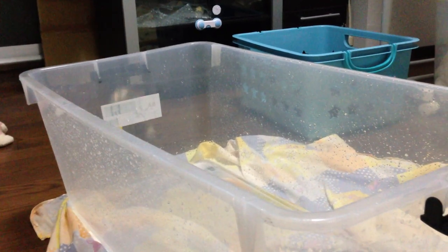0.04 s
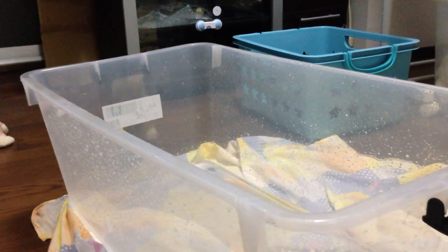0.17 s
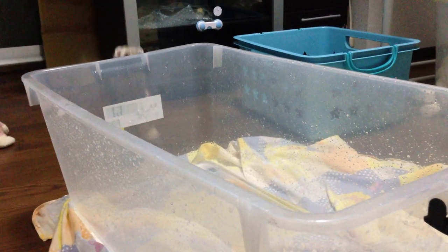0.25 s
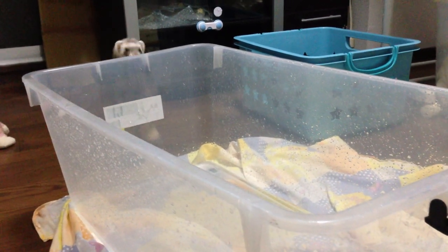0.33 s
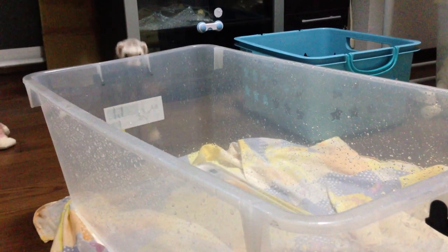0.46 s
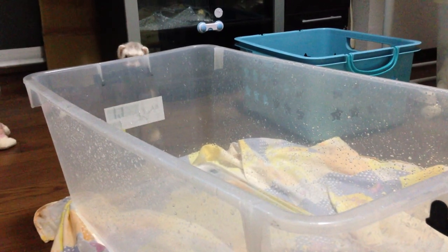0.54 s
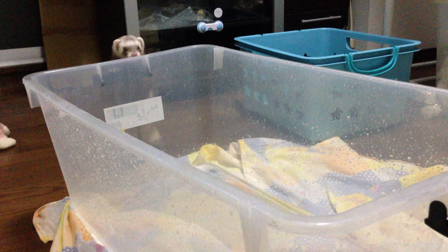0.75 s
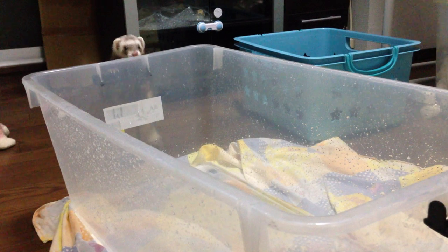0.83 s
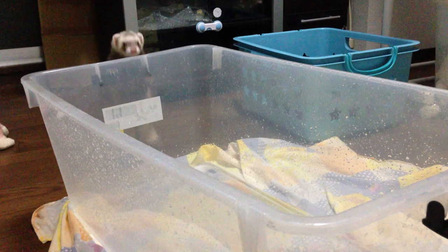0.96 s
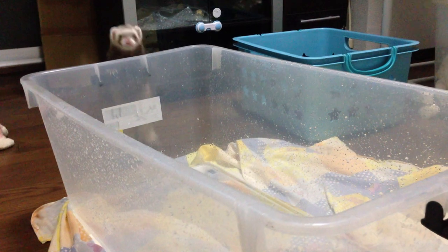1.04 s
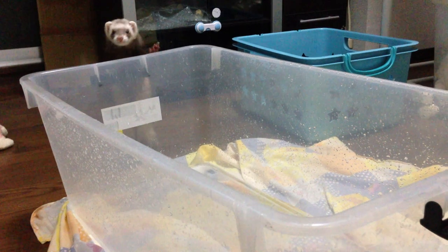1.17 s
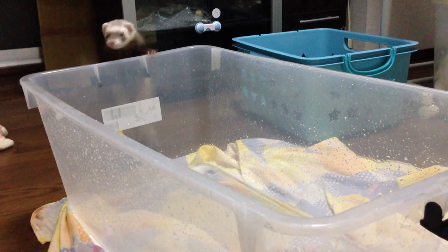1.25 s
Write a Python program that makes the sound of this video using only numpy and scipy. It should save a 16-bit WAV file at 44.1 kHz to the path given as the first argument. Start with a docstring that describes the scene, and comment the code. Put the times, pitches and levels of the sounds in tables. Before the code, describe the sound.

A ferret's paws bump a plastic bin twice, the second knock louder, each followed by lighter claw taps. A paw slides briefly, then faint touches and fur rustling fade into the hiss of a quiet room.

```python
"""Ferret climbing in a plastic bin.

Its paws bump the far wall twice, with lighter claw taps after each bump; the thin wall booms and
clacks in its modes and the quiet room answers. Soft feet thud on the floor, a paw slides briefly
over the plastic, and a few faint touches follow over rustling fur and the room's hiss."""
import sys
import numpy as np
from scipy import signal
from scipy.fft import rfft, irfft
from scipy.io import wavfile
from scipy.ndimage import uniform_filter1d

SR = 44100
rng = np.random.default_rng(int(sys.argv[2]) if len(sys.argv) > 2 else 0)


def file_out(sig):
    """Save sig as 16-bit WAV at sys.argv[1]."""
    # one column per channel
    cols = np.atleast_2d(sig).T
    # limit, then scale
    lim = np.clip(cols, -1, 1)
    pcm = np.round(lim * 32767).astype(np.int16)
    wavfile.write(sys.argv[1], SR, pcm)


N = 57330


def amp(db):
    """Decibels to gain."""
    return 10 ** (np.asarray(db) / 20)


def unit_rms(x):
    """Scales to rms 1."""
    return x / np.sqrt(np.mean(x ** 2) + 1e-20)


def at_hz(points, hz):
    """Interpolates a table on a log-frequency axis."""
    points_hz, values = np.transpose(points)
    return np.interp(np.log(hz + 1), np.log(points_hz + 1), values)


def add(mix, start_s, sound):
    """Mixes a sound in at start_s."""
    part = mix[round(start_s * SR):][:len(sound)]
    part += sound[:len(part)]


def coloured(x, colour):
    """Filters by a table of dB over Hz."""
    hz = np.fft.rfftfreq(len(x), 1 / SR)
    return irfft(rfft(x) * amp(at_hz(colour, hz)), len(x))


def noise(colour, size):
    """Coloured noise of rms 1."""
    return unit_rms(coloured(rng.standard_normal(size), colour))


def grain(samples):
    """Random flicker of rms 1, smoothed over the given length."""
    return unit_rms(uniform_filter1d(rng.standard_normal(N), size=samples))


def room_hiss(level_db=-65.5):
    """Steady background air, strongest in the bass."""
    # Each row: frequency in Hz, relative density in dB.
    colour = [(20, -14), (40, 14.5), (70, 3), (110, 5), (160, 10), (260, 7.5), (500, 2.5), (1050, -9.5),
              (2000, -7), (4000, -7.5), (9000, -10), (15000, -10.5)]
    return amp(level_db) * noise(colour, N)


def fur_rustle(grain_db=1.5):
    """Fur brushes faintly along the bin."""
    # Each row: time in seconds, level in dB.
    levels = [(0, -72.5), (.17, -70), (.65, -72.5), (.9, -71.5), (1.02, -69), (1.13, -69), (1.22, -70.5),
              (1.29, -67.5)]
    # Each row: frequency in Hz, relative density in dB.
    colour = [(80, -28), (200, -8.5), (450, -2.5), (1050, 1), (1800, -6), (4000, -34), (12000, -31)]
    level_db = np.interp(np.arange(N) / SR, *np.transpose(levels))
    return amp(level_db + grain_db * grain(300)) * noise(colour, N)


def contact_click(size, level_db=-3.5, delay_s=.0003):
    """A sharp click just after first touch, echoed by the bin's other walls."""
    # Each row: frequency in Hz, relative gain in dB.
    colour = [(200, 0.5), (1300, -19), (2000, 3), (2300, -7), (2800, -15), (3300, -12), (5000, -3),
              (7000, -3.5), (10500, -10), (13000, -31), (15000, -38)]
    # Each row: delay in seconds, gain in dB.
    echoes = [(.0018, -6.5), (.0053, -23)]
    log_gain = np.log(amp(at_hz(colour, abs(np.fft.fftfreq(size, 1 / SR)))))
    pulse = np.fft.ifft(np.exp(np.conj(signal.hilbert(log_gain)))).real  # minimum phase
    pulse *= amp(level_db) / abs(pulse).max()
    out = np.zeros(size)
    add(out, delay_s, pulse)
    for echo_s, db in echoes:
        add(out, delay_s + echo_s, amp(db) * pulse)
    return out


def wall_ring(t, force, place, spread_s=.0014, swell_cycles=.6):
    """The wall's main modes swell and decay; the place struck sets their balance."""
    # Mode frequencies in Hz.
    modes_hz = [129, 180, 235, 285, 340, 402, 490, 700, 835, 1023, 1539, 1700, 1893, 2137, 2680, 2900]
    # Each row: gain in dB struck at the edge, gain in dB struck mid-wall, T60 in seconds.
    modes = [(-10.5, -9.5, .15), (0.5, -17, 0.13), (-15, 0.5, 0.17), (-11, -8, 0.076), (-8.5, -6.5, 0.051),
             (0, -14, 0.12), (-31, -16, 0.035), (-4.5, -3, 0.061), (-12.5, -16, 0.057), (-35, -0.5, 0.06),
             (-3.5, -2.5, 0.054), (-10.5, -16, 0.038), (-1.5, -3, 0.03), (-1.5, 5, 0.017),
             (-12, -3.5, 0.032), (-13, -1, 0.024)]
    ring = 0
    for k, (hz, (edge_db, centre_db, t60_s)) in enumerate(zip(modes_hz, modes)):
        strength = amp(edge_db + place * (centre_db - edge_db) + at_hz(force, hz))
        swell = 1 - np.exp(-t / (spread_s + swell_cycles / hz))
        decay = amp(-60 * t / t60_s)
        ring += (-1) ** k * strength * swell * decay * np.sin(2 * np.pi * hz * t)
    return ring


def wall_crack(t, force, level_db=-5, bands=12):
    """The crowd of weaker modes: a noise burst, each band dying at its own rate."""
    # Each row: frequency in Hz, relative density in dB.
    colour = [(60, -13.5), (200, -2.5), (400, -0.5), (560, -14.5), (750, -24), (1200, -5), (1600, -4.5),
              (2200, -2), (2900, -3), (3400, -4.5), (4500, -8.5), (5500, -15), (9000, -24), (15000, -37)]
    # Each row: frequency in Hz, T60 in seconds.
    t60s = [(200, 0.12), (1500, 0.077), (3000, 0.053), (9000, 0.061)]
    spectrum = rfft(coloured(noise(colour, len(t)), force))
    log_hz = np.log(np.fft.rfftfreq(len(t), 1 / SR) + 1)
    centres_hz = np.geomspace(100, 12800, bands)
    crack = 0
    for hz, share in zip(centres_hz, np.eye(bands)):
        band = irfft(spectrum * np.interp(log_hz, np.log(centres_hz), share), len(t))
        crack += band * amp(-60 * t / at_hz(t60s, hz))
    return amp(level_db) * crack


def wall_knocks(grip_s=.0276, grip_db_per_s=705, size=16384):
    """Paws and claws strike the wall; the settling paw damps the ring and click."""
    # Each row: start in seconds, boom, hollow middle, clack and claw tick in dB,
    # rise in seconds, place from 0 (stiff edge) to 1 (mid-wall).
    contacts = [(0.010, -58.5, -74, -76, -80, .004, 1), (0.207, -55, -38.5, -40, -37.5, 0.0019, 0.3),
                (0.2097, -44.5, -49.5, -36.5, -44, 0.00067, 0.29),
                (0.2133, -37.5, -36, -49, -46, 0.00036, 0.054), (0.234, -42.5, -54, -58, -51, 0.0014, 0.14),
                (0.2680, -49, -46.5, -46.5, -46.5, 0.00071, 0.47),
                (0.3156, -46, -48.5, -51, -49.5, 0.00092, 0.63),
                (0.365, -45.5, -49, -54, -109, 0.0062, 0.85),
                (0.4326, -21.5, -30.5, -27.5, -35, 0.000072, 0.93),
                (0.4853, -56, -48, -44, -55, 0.0028, 0.91), (0.491, -34.5, -64, -61, -70, 0.0022, 0.65),
                (0.5052, -39, -52, -50.5, -72, 0.001, 0.8), (0.5628, -48.5, -50, -56.5, -74, .001, .5),
                (0.586, -49, -73, -60, -50, 0.0018, 0.77), (0.633, -62, -74, -79, -81, 0.0039, 0.95),
                (0.7789, -56.5, -59, -59.5, -43.5, 0.0022, 1), (0.790, -50.5, -49.5, -72, -49, 0.009, 0.56),
                (0.821, -62.5, -58, -62, -69, 0.0054, 0.006), (0.895, -66, -67, -56, -85, 0.0033, 0)]
    # Centres in Hz of boom, middle, clack and tick.
    bands_hz = [330, 850, 1900, 6000]
    out, t = np.zeros(N), np.arange(size) / SR
    grip = amp(-grip_db_per_s * np.maximum(t - grip_s, 0))
    click = contact_click(size)
    for start_s, *levels_db, rise_s, place in contacts:
        force = list(zip(bands_hz, levels_db))
        damped = (wall_ring(t, force, place) + coloured(click, force)) * grip
        attack = 1 - np.exp(-t / rise_s)
        add(out, start_s, (damped + wall_crack(t, force)) * attack)
    return out


def room_reverb(x, delay_s=.01, frame=256):
    """A diffuse wash: each band stores the sound's energy and lets it die away."""
    # Each row: frequency in Hz, gain in dB.
    colour = [(100, -18.5), (240, -16), (400, -14.5), (550, -5.5), (720, -6.5), (1020, -6.5), (1250, -7),
              (1550, -7), (2800, -6.5), (4500, -8), (8000, -7)]
    # Each row: frequency in Hz, T60 in seconds.
    t60s = [(130, 0.33), (500, .28), (2000, 0.2), (8000, 0.25)]
    hz, t, spectra = signal.stft(x, SR, nperseg=frame)
    decay = np.exp(-np.log(1e6) * t / at_hz(t60s, hz)[:, None])
    decay /= decay.sum(1, keepdims=True)
    energy = signal.fftconvolve(abs(spectra) ** 2, decay, axes=1)[:, :len(t)]
    scatter = signal.stft(rng.standard_normal(N), SR, nperseg=frame)[2]
    wash = signal.istft(np.sqrt(abs(energy)) * scatter / scatter.std(), SR, nperseg=frame)[1][:N]
    out = np.zeros(N)
    add(out, delay_s, coloured(wash, colour))
    return out


def footfalls(note_hz=166.5, peak_s=.012):
    """Padded feet thud on the floor, all with one dull note."""
    # Each row: start in seconds, level in dB.
    steps = [(0.267, -52), (0.29, -79), (0.506, -47.5), (1.07, -62), (1.197, -63)]
    out, t = np.zeros(N), np.arange(SR // 4) / SR
    thud = t / peak_s * np.exp(1 - t / peak_s) * np.sin(2 * np.pi * note_hz * t)
    for start_s, db in steps:
        add(out, start_s, amp(db) * thud)
    return out


def paw_slide(peak_s=.601, rise_s=.013, fall_s=.027, turn_s=.0091, level_db=-58, grain_db=1.5):
    """A paw slips over the plastic: a short grainy hiss that thins as the paw speeds up."""
    # Each row: frequency in Hz, relative density in dB.
    colour = [(100, -18), (500, -10), (2000, 6), (3900, 5.5), (5000, 1.5), (6300, 1), (9500, -3.5),
              (12000, -14), (15000, -15)]
    # Tilt faded in around the peak. Each row: frequency in Hz, gain in dB.
    late_tilt = [(1000, -8), (3500, -2.5), (6500, 2), (12000, 1.5)]
    t = np.arange(N) / SR - peak_s
    envelope = np.exp(np.minimum(t, 0) / rise_s - np.maximum(t, 0) / fall_s)
    hiss = unit_rms(amp(grain_db * grain(60)) * noise(colour, N))
    late = .5 + .5 * np.tanh(t / turn_s)
    return amp(level_db) * envelope * ((1 - late) * hiss + late * coloured(hiss, late_tilt))


def scene():
    """Mono mix; only the knocks excite the room."""
    knocks = wall_knocks()
    return (knocks + room_reverb(knocks) + paw_slide() + footfalls() + fur_rustle() + room_hiss())[None]


def record(dry, low_cut_hz=115, high_cut_hz=15300):
    """The microphone drops the deep bass; a steep low-pass limits the treble."""
    highpass = signal.butter(3, low_cut_hz, "high", fs=SR, output="sos")
    lowpass = signal.firwin(511, high_cut_hz, window=("kaiser", 9), fs=SR)
    return signal.oaconvolve(signal.sosfilt(highpass, dry), lowpass[None], "same")


dry = scene()
out = record(dry)
file_out(out)
```